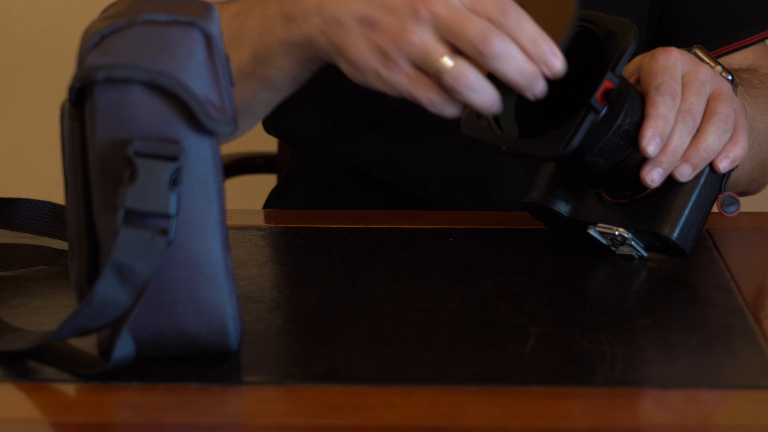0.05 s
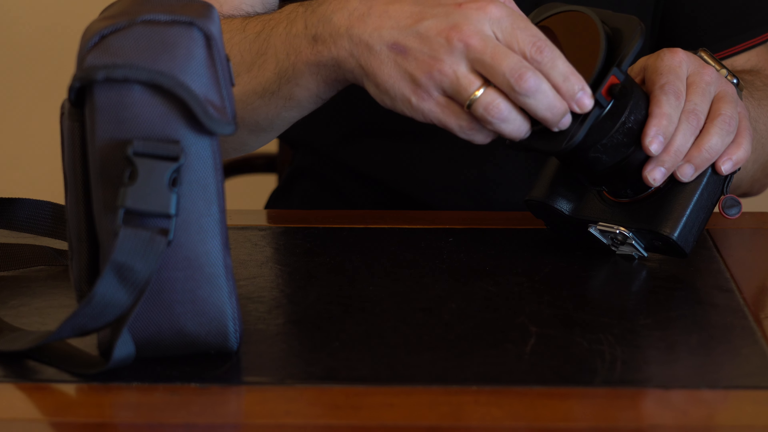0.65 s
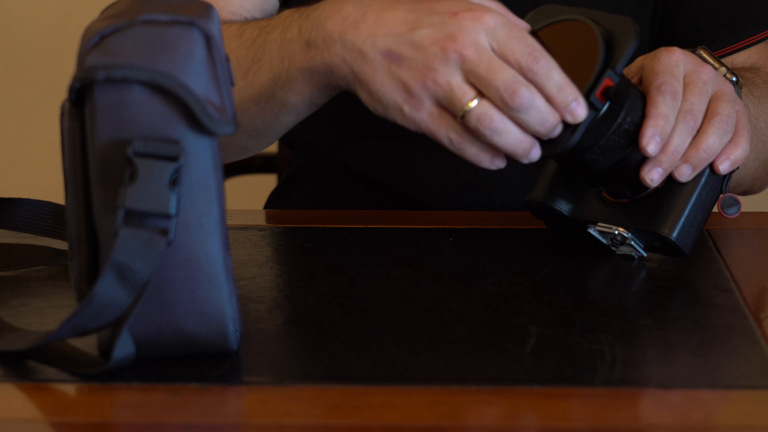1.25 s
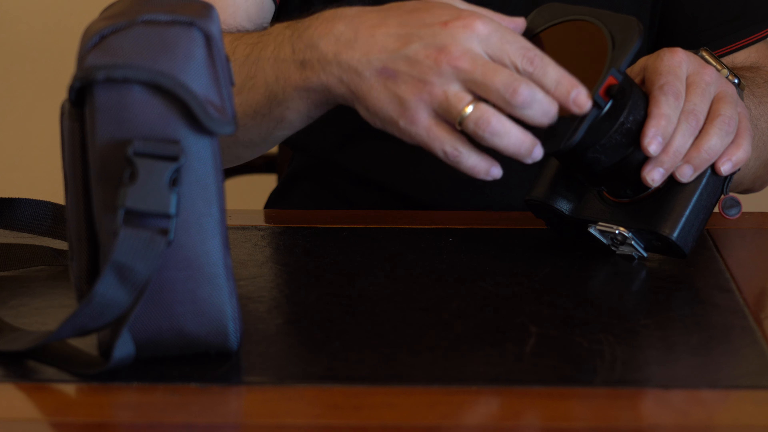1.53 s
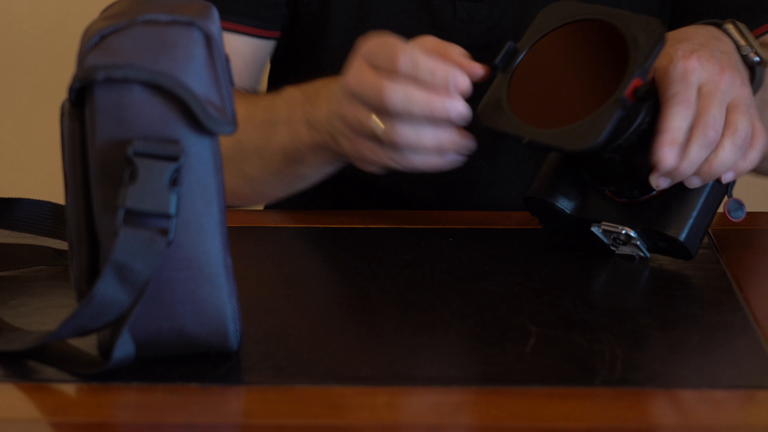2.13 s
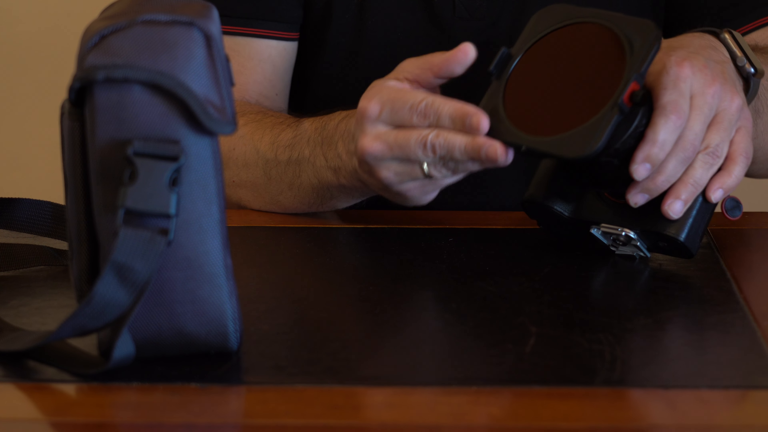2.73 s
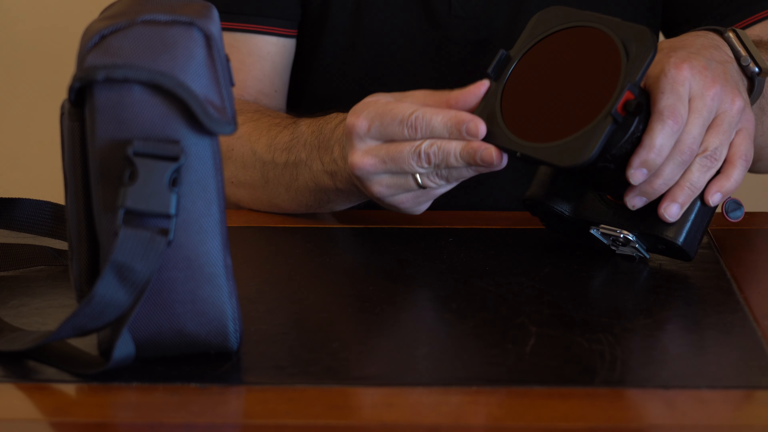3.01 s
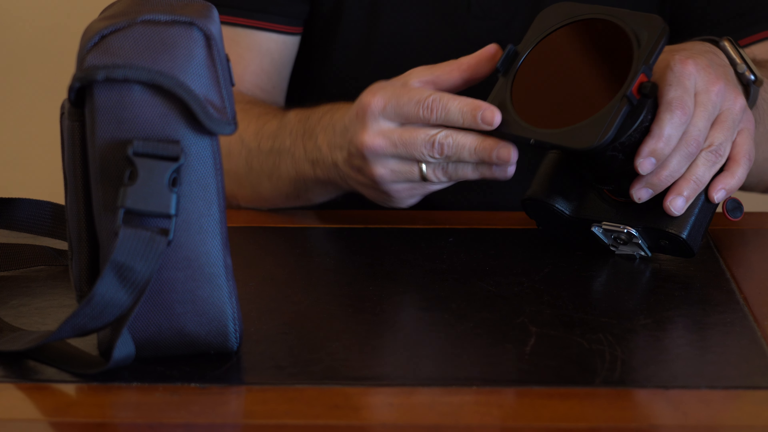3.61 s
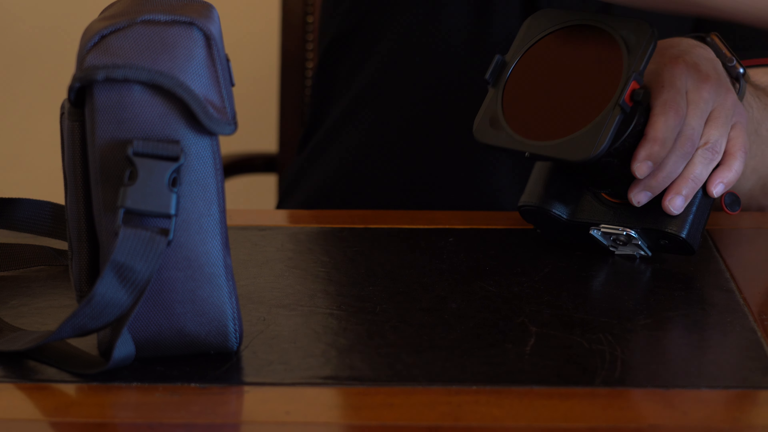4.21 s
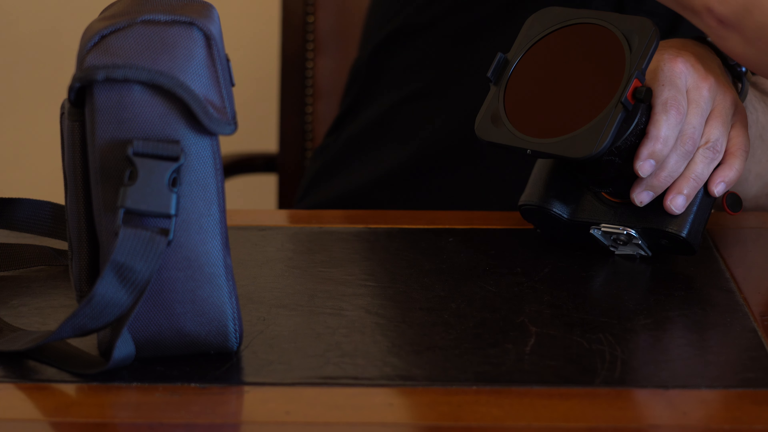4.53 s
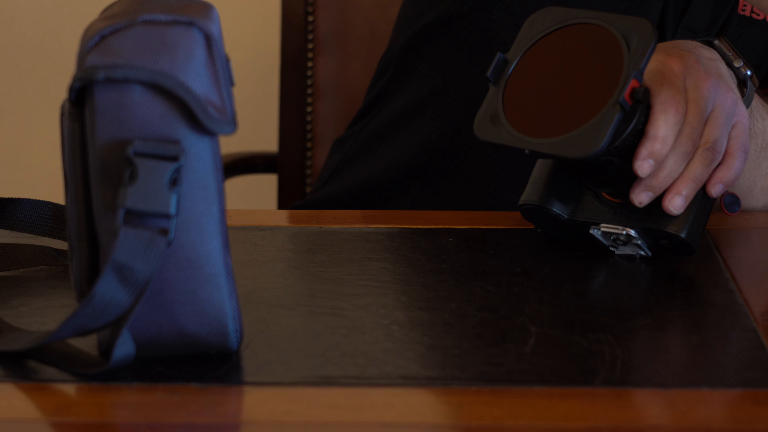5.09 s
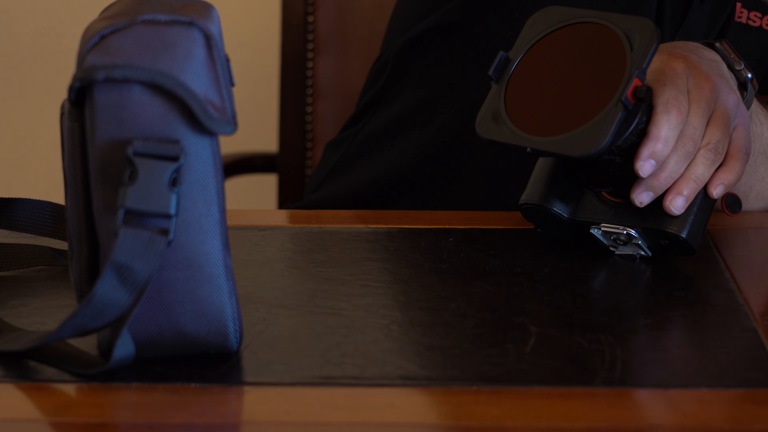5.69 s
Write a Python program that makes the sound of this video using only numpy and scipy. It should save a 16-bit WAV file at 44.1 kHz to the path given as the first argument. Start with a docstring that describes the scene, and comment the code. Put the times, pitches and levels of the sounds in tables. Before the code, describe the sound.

Sharp glassy taps, a short scrape and a loud plastic snap as a filter is fitted to a camera, then soft handling.

```python
"""At a desk in a bare room, a glass filter is tapped into a metal and plastic holder on a camera lens.
Each tap cracks and rings the glass, rim and springs; the filter rattles as it settles. A square frame
scrapes down the holder's slots in two strokes and seats with a loud snap, amid ticks, creaks and squeaks.
Afterwards an arm shifts with a rasp of its sleeve and a hand regrips the camera. Nudges make the desk
boom, and the room rings on after every contact over a low murmur of air."""
import sys
import numpy as np
from scipy import signal
from scipy.fft import rfft, irfft, next_fast_len
from scipy.io import wavfile
from scipy.ndimage import map_coordinates

SR = 44100
rng = np.random.default_rng(int(sys.argv[2]) if len(sys.argv) > 2 else 0)


def materialize(psi):
    """Save the field psi as 16-bit PCM at rate SR to the path in sys.argv[1].

    A 1-D psi becomes a single channel; in a 2-D psi each row is a channel.
    """
    bounded = np.clip(np.atleast_2d(psi).T, -1, 1)
    quanta = np.round(bounded * 32767).astype(np.int16)
    wavfile.write(sys.argv[1], SR, quanta)


N = 262395
AGE = np.arange(SR // 4) / SR  # seconds since a hit
GRID_HZ = np.fft.rfftfreq(4096, 1 / SR)

# the filter hitting the holder: start_s, crack_db, rim_db, rim_pitch_hz, springs_db, glass_db,
# favoured_glass_hz, edge_db, knock_db, barrel_db, hardness_db_per_octave
FILTER_TAPS = [(.626, -23.5, -33, 2046, -44, -34, 6880, -39, -43, -45, 3),
               (.6288, -34, -41, 1970, -38, -37, 6880, -39, -41, -71, -9.5),
               (.922, -58, -63, 2060, -55, -57, 6360, -61, -51.5, -70, 7),
               (1.041, -23, -36.5, 2108, -28, -26.5, 6520, -34, -48, -48, -0.5),
               (1.105, -29, -33, 2048, -39.5, -28, 6360, -42, -40.5, -55, 0.5),
               (1.3327, -25.5, -37.5, 2093, -41, -33.5, 6520, -38, -42, -40.5, -0.5),
               (1.341, -32, -46, 2070, -39, -33.5, 6880, -37, -47, -53, -0.5),
               (1.5305, -17, -39.5, 2104, -36, -32, 6500, -46, -33, -40.5, 11),
               (1.537, -19, -41, 2055, -37, -42, 6680, -38, -35, -36, -0.5),
               (1.546, -21.5, -44, 2085, -35, -31, 6500, -28.5, -37.5, -40, -1)]
# the frame catching and seating in the slots: start_s, crack_db, knock_db
FRAME_SNAPS = [(2.632, -60, -71), (2.92, -48, -70), (3.025, -38, -75), (3.272, -24.5, -26),
               (3.2763, -15.5, -33.5)]
# pushes along the slots, levels at full speed: start_s, length_s, scrape_db, rub_db
SLOT_PUSHES = [(1.481, 0.038, -33, -44), (2.513, 0.11, -35.5, -40), (2.887, 0.13, -25, -40)]
# the holder's clips ticking: start_s, crack_db, pitch_hz, ring_db
CLIP_TICKS = [(2.350, -47.5, 4930, -55), (2.419, -48.5, 8380, -50), (2.8737, -44, 8320, -44),
              (3.125, -33.5, 7600, -47), (3.2605, -40, 8400, -37), (3.934, -61, 5060, -67),
              (5.2837, -40.5, 9200, -60), (5.3253, -38.5, 8940, -55), (5.543, -43, 4070, -55),
              (5.8578, -50, 8600, -67)]
# plastic creaking under the fingers: start_s, pitch_hz, level_db
PLASTIC_CREAKS = [(2.635, 1630, -39), (3.023, 1920, -35.5), (3.575, 2200, -45), (3.787, 2270, -55.5),
                  (5.698, 2000, -50), (5.761, 1970, -52)]
# the camera or arm nudging the desk: start_s, boom_db, sway_db
DESK_NUDGES = [(1.556, -49, -68), (1.612, -39.5, -57), (1.72, -49, -66), (2.659, -50, -60),
               (2.745, -50, -59), (3.29, -45, -62), (3.332, -40, -43.5), (4.34, -54, -64),
               (4.461, -50.5, -62), (4.569, -52, -66), (4.635, -50, -63), (4.72, -53, -65),
               (5.208, -46.5, -60), (5.25, -50, -62)]
# shifts of the arm and hand: start_s, rise_s, hold_s, dull_rub_db, hollow_rub_db, rustle_db
ARM_MOVES = [(0, 0.0011, 0.074, -71, -74, -53.5), (4.1, .22, .17, -51, -57, -66),
             (4.555, .015, .1, -51, -53, -63), (4.71, .03, .02, -53, -63, -73),
             (5.195, 0.011, 0.062, -48.5, -67, -58), (5.262, 0.045, 0.083, -58, -50.5, -56.5),
             (5.385, 0.093, 0.059, -57, -49, -54.5), (5.602, 0.012, 0.013, -52.5, -53.5, -54)]

# stick-slip glides: time_s, pitch_hz, relative_level_db
FINGER_GLIDE = [(2.432, 4100, -64), (2.447, 4450, -51), (2.485, 4750, -48), (2.51, 4600, -54),
                (2.54, 4470, -59)]
FRAME_GLIDE = [(2.495, 725, -60), (2.51, 707, -48), (2.53, 647, -43), (2.545, 701, -38), (2.56, 690, -52),
               (2.58, 700, -62)]
SLEEVE_GLIDE = [(4.205, 5300, -68), (4.235, 5350, -52), (4.29, 5380, -51), (4.32, 5350, -43.5),
                (4.37, 5100, -44.5), (4.40, 4850, -42.5), (4.44, 4650, -46), (4.465, 4600, -54),
                (4.515, 4550, -48), (4.545, 4400, -68)]
# strands of a rubbing contact: pitch_ratio, relative_level_db
STRANDS = [(1, -2.5), (.87, -1.5), (.79, -5), (.7, -7)]

# what rings when struck: pitch_hz, relative_level_db, t60_s
GLASS_MODES = [(5470, 4, 0.031), (6220, -2, .041), (6350, -1.5, 0.074), (6460, 0.5, 0.06), (6710, -4, .045),
               (6730, -2, .046), (6800, -8, .036)]
EDGE_MODES = [(8550, -1, 0.052), (8200, -5, .05), (8700, -5, 0.032), (9100, -7, 0.031)]  # the filter's edge
SPRING_MODES = [(3534, 4, 0.029), (4014, 2.5, 0.027), (4200, -5, 0.018), (4650, -2, 0.011),
                (5360, -2, 0.013), (5700, -9, 0.033)]  # the holder's springs
BARREL_MODES = [(823, -2, 0.06), (860, -4.5, 0.071)]  # the holder's barrel
BODY_MODES = [(312, -6, 0.054), (339, -6, 0.061), (464, 1, 0.069), (624, 4, 0.037), (720, -10.5, 0.04),
              (932, 2.5, 0.023)]  # camera and holder together
FRAME_MODES = [(318, -5.5, 0.092), (505, -3, 0.077), (540, 4, 0.063), (621, 1.5, 0.059), (685, -3, 0.081),
               (962, 0.5, 0.053), (1045, -0.5, 0.05), (1220, -7, 0.073), (1260, -17, 0.069),
               (1778, 1, 0.043), (2540, -1, 0.069)]
DESK_TOP_MODES = [(98, -8, .06), (118, -4, .07), (145, 2, .055), (172, -4, .05), (198, -5, .045)]
DESK_SWAY_MODES = [(57, -9, 0.097), (76.4, -0.5, 0.086)]
ROOM_MODES = [(59.4, -48.5, 1.97), (72, -59, 1.1), (116.1, -43, 0.69), (144.1, -47, 0.71), (165, -51.5, 1),
              (312.2, -44.5, 0.56), (518, -50, 0.33), (608, -46, 0.23), (831, -53.5, 0.76),
              (928, -42.5, 0.33)]  # standing waves
# rings tuned anew for each hit: pitch_ratio, relative_level_db, t60_s
RIM_MODES = [(.96, -13, .045), (1, -3, .13), (1.025, -11, .035)]  # the filter's metal rim, whose pitch shifts with the grip
CLIP_MODES = [(.96, -1, .012), (1, 6, .015), (1.04, 1, .011), (1.13, -6, 0.025)]

# tone colours of the cracks and noises: frequency_hz, relative_level_db
TAP_EQ = [(30, -22.5), (150, -4.5), (400, -5), (1400, -5), (3000, -2.5), (5000, -1.5), (6600, 6),
          (8500, 2.5), (11000, -3), (16000, -9.5)]
SNAP_EQ = [(30, -30), (60, -12), (200, -3), (450, 7.5), (900, 3.5), (1400, 2.5), (1850, 1), (2600, 0.5),
           (4500, 1.5), (8000, 2.5), (11000, 1.5), (16000, -6)]
TICK_EQ = [(100, -4), (2000, -5), (5000, 2.5), (7200, 6), (8300, 9), (9500, 4), (16000, -1)]
SCRAPE_EQ = [(300, -77), (1200, -21), (3000, -9.5), (5000, -5), (8000, -1), (11000, -7.5), (16000, -13.5)]
RUB_EQ = [(40, -38), (120, -4.5), (250, -15), (450, -7), (680, -6), (900, -7), (1300, -7.5), (2200, -7.5),
          (4000, -13), (12000, -26)]
ARM_EQ = [(30, -54), (70, -20), (115, 4), (190, 3.5), (330, -4), (480, -4.5), (900, -16.5), (2000, -13.5),
          (5000, -30.5), (16000, -42)]
RUSTLE_EQ = [(300, -44), (900, -5), (2000, -4), (4000, -4), (8000, -11), (16000, -22)]
HOLLOW_EQ = [(100, -28), (200, -4.5), (320, 0.5), (440, -2), (600, -10), (850, -10), (1300, -23),
             (4000, -51), (16000, -70)]  # the camera body under a rubbing hand
AIR_EQ = [(15, -76), (25, -10), (43, -27), (76, -5), (149, 3), (170, -10), (206, -5), (394, -9), (503, -6),
          (545, -3.5), (695, -10), (1160, -12), (3520, -16), (16000, -25.5)]

# reverb time of the bare walls: frequency_hz, t60_s
WALL_DECAY = [(60, 0.99), (150, 1), (400, 0.5), (1000, 0.6), (2000, 0.6), (4000, 0.48), (8000, 0.44),
              (15000, 0.27)]
# stereo width of the reverb and the air: frequency_hz, side_minus_mid_db
REVERB_SPREAD = [(80, -30), (170, -23), (350, -14), (700, -9.5), (1400, -4), (2800, 0), (8000, -0.8)]
AIR_SPREAD = [(80, -32), (200, -9.5), (500, -4), (1400, 2), (8000, 0)]
# the lean to the right, added on that side and taken off the left: frequency_hz, gain_db
RIGHT_LEAN = [(300, 0), (2000, 0.33), (4000, 0), (8000, 1), (16000, 0)]


def filter_taps(favour_db=5, favour_width_hz=71, desk_under_knock_db=-12.5):
    """Each tap cracks, rings the filter and its holder, and knocks the camera and the desk under it."""
    out = np.zeros((2, N))
    for (start, crack_db, rim_db, rim_hz, springs_db, glass_db,
         favoured_hz, edge_db, knock_db, barrel_db, hardness) in FILTER_TAPS:
        rim = np.multiply(RIM_MODES, [rim_hz, 1, 1])
        # the point of contact favours the glass modes near one pitch
        glass = [(hz, db + favour_db * np.exp(-((hz - favoured_hz) / favour_width_hz) ** 2), t60)
                 for hz, db, t60 in GLASS_MODES]
        hit = amp(crack_db) * crack(TAP_EQ, t60_s=0.02, rise_s=0.0001, spike=1.8, tilt_db=hardness)
        for modes, db in [(rim, rim_db), (SPRING_MODES, springs_db), (glass, glass_db),
                          (EDGE_MODES, edge_db), (BARREL_MODES, barrel_db)]:
            hit += amp(db) * ring(modes, scatter_db=1.5, detune=0.002, rise_s=0.0003)
        hit += amp(knock_db) * ring(BODY_MODES, scatter_db=0.5, detune=0.023, rise_s=0.00026)
        desk = ring(DESK_TOP_MODES, scatter_db=2, detune=0.014, rise_s=0.0026)
        hit += amp(knock_db + desk_under_knock_db) * desk
        add(out, start, room(hit, wet_db=1.5))
    return out


def filter_rattle(start_s=1.565, gap_s=0.021, contacts=6, level_db=-25, loss_db=3):
    """The settling filter chatters in ever weaker, uneven contacts, each with a knock of the holder."""
    out = np.zeros((2, N))
    for k, jitter in enumerate(rng.uniform(-0.3, 0.3, contacts)):
        click = crack(TAP_EQ, t60_s=0.017, rise_s=0.0004, spike=0.82)
        knock = amp(-10.5) * ring(BODY_MODES, scatter_db=2.5, detune=0.039, rise_s=0.00068)
        hit = amp(level_db - k * loss_db) * (click + knock)
        add(out, start_s + (k + jitter) * gap_s, room(hit, wet_db=4))
    return out


def frame_snaps():
    """The plastic frame catches, then hits its stop: a broad crack over a hollow knock."""
    out = np.zeros((2, N))
    for start, crack_db, knock_db in FRAME_SNAPS:
        hit = amp(crack_db) * crack(SNAP_EQ, t60_s=0.014, rise_s=0.00096, spike=0.77)
        hit += amp(knock_db) * ring(FRAME_MODES, scatter_db=1.5, detune=0.003, rise_s=0.0004)
        add(out, start, room(hit, wet_db=5))
    return out


def slot_slides(grip_s=0.057, stop_t60_s=0.11):
    """Edges scrape in the slots over a lower rub; as a push gathers speed, the scrape swells most."""
    scrape_gain, rub_gain = np.zeros((2, N))
    for start, length, scrape_db, rub_db in SLOT_PUSHES:
        scrape_gain += amp(scrape_db) * stroke(start, grip_s, length, stop_t60_s, swell_db=48)
        rub_gain += amp(rub_db) * stroke(start, grip_s, length, stop_t60_s, swell_db=1)
    scrape = scrape_gain * friction(SCRAPE_EQ, slips_per_s=900, grit=0.76, judder_db=-2)
    rub = rub_gain * friction(RUB_EQ, slips_per_s=430, grit=0.47, judder_db=2)
    return room(scrape + rub, wet_db=-1)[:, :N]


def clip_ticks():
    """The holder's clips tick, light and bright, each with a brief ring."""
    out = np.zeros((2, N))
    for start, crack_db, hz, ring_db in CLIP_TICKS:
        modes = np.multiply(CLIP_MODES, [hz, 1, 1])
        hit = amp(crack_db) * crack(TICK_EQ, t60_s=0.014, rise_s=0.0002, spike=1)
        hit += amp(ring_db) * ring(modes, scatter_db=1, detune=0.002, rise_s=0.0003)
        add(out, start, room(hit, wet_db=3.5))
    return out


def plastic_creaks():
    """The plastic sticks and lets go in a short pitched rasp."""
    out = np.zeros((2, N))
    for start, hz, db in PLASTIC_CREAKS:
        resonance = [(hz / 2, -30), (hz * 0.88, -4), (hz, 0), (hz * 1.12, -4), (hz * 2, -30)]
        rasp = amp(db) * crack(resonance, t60_s=0.029, rise_s=0.00032, spike=0)
        add(out, start, room(rasp, wet_db=-1))
    return out


def squeaks():
    """A fingertip squeaks on the frame, the frame groans into motion, a sleeve drags in a falling rasp."""
    finger = stick_slip(FINGER_GLIDE, STRANDS[:2], roughness=0.06, flutter_db=2, overtone_db=-24)
    frame = stick_slip(FRAME_GLIDE, STRANDS[:1], roughness=0.2, flutter_db=3, overtone_db=-14)
    sleeve = stick_slip(SLEEVE_GLIDE, STRANDS, roughness=0.048, flutter_db=3.5, overtone_db=-11)
    return room(amp(-3) * (finger + frame + sleeve), wet_db=-1)[:, :N]


def desk_thumps(rise_s=0.0031):
    """Soft nudges make the desk top boom and the whole desk sway."""
    out = np.zeros((2, N))
    attack = 1 - np.exp(-AGE / rise_s)  # soft flesh spreads the push
    for start, boom_db, sway_db in DESK_NUDGES:
        boom = amp(boom_db) * ring(DESK_TOP_MODES, scatter_db=1, detune=0.01, rise_s=0.0026)
        sway = amp(sway_db) * ring(DESK_SWAY_MODES, scatter_db=1, detune=0.005, rise_s=0.0026)
        add(out, start, room((boom + sway) * attack, wet_db=2))
    return out


def handling(settle_t60_s=0.28):
    """The arm drags in dull stutters, the hand rubs the hollow camera body, skin and cloth rustle."""
    arm_gain, hollow_gain, rustle_gain = sum(
        np.outer(amp(levels_db), stroke(start, rise, rise + hold, settle_t60_s))
        for start, rise, hold, *levels_db in ARM_MOVES)
    arm = arm_gain * friction(ARM_EQ, slips_per_s=221, grit=1, judder_db=3.5)
    rustle = rustle_gain * friction(RUSTLE_EQ, slips_per_s=1500, grit=0.4, judder_db=4)
    hollow = hollow_gain * friction(HOLLOW_EQ, slips_per_s=110, grit=1.5, judder_db=4)
    return room(arm + rustle + hollow, wet_db=-2)[:, :N]


def room(x, wet_db, predelay_s=0.007, shadow=0.19, build_s=0.0024, bass_hz=139):
    """The direct sound, then the walls' dense reverb and the building standing waves."""
    hz, t, spectra = signal.stft(rng.standard_normal((2, SR)), SR, nperseg=256)
    decay = amp(-60 * t / along(WALL_DECAY, hz)[:, None])
    tail = signal.istft(spectra * decay, SR, nperseg=256)[1][:, :SR]
    tail = diffuse(tail, REVERB_SPREAD)
    tail = low_cut(tail / np.linalg.norm(tail[0]), bass_hz, order=2)  # standing waves take over below
    t = np.arange(SR) / SR
    build = 1 - np.exp(-t / build_s)
    for mode_hz, db, t60 in ROOM_MODES:
        tail += amp(db - 8 - 60 * t / t60) * build * np.sin(2 * np.pi * mode_hz * t)
    response = amp(wet_db) * np.pad(tail, ((0, 0), (round(predelay_s * SR), 0)))
    response[:, :3] += [[1 - shadow, shadow, 0], [0, 1 + shadow, -shadow]]  # direct: brighter on the right
    return signal.fftconvolve(x[None], response, axes=1)


def room_air(level_db=-55):
    """Room tone: a steady low murmur of air and a faint hiss."""
    murmur = filtered(rng.standard_normal((2, N)), lambda hz: amp(along(AIR_EQ, hz)))
    return amp(level_db) * unit(diffuse(murmur, AIR_SPREAD))


def crack(eq, t60_s, rise_s, spike, tilt_db=0):
    """Hard edges meet: a spike and a burst of chatter, tilted per octave so harder hits are brighter."""
    burst = rng.standard_normal(len(AGE)) * amp(-60 * AGE / t60_s) * (1 - np.exp(-AGE / rise_s))
    burst[0] += spike
    power = np.abs(rfft(burst, 2 * len(GRID_HZ) - 2)) ** 2
    flatten = 1 / np.sqrt(power / power.mean() + 0.08)  # evens out the burst's chance peaks
    octaves = np.log2(np.maximum(GRID_HZ / 700, 1))
    return unit_attack(causal(burst, flatten * amp(along(eq, GRID_HZ) + tilt_db * octaves)))


def ring(modes, scatter_db, detune, rise_s):
    """Damped modes; grip and point of contact vary their strengths and pitches at each hit."""
    hz, db, t60 = np.transpose(modes)[:, :, None]
    scatter, shift, polarity = rng.standard_normal((3, len(modes), 1))
    swing = np.sign(polarity) * np.sin(2 * np.pi * hz * (1 + detune * shift) * AGE) / hz
    decay = amp(db + scatter_db * scatter - 60 * AGE / t60)
    motion = (decay * swing).sum(0) * (1 - np.exp(-AGE / rise_s))
    return unit_attack(np.diff(motion, prepend=0))  # the surface's speed is what radiates


def friction(eq, slips_per_s, grit, judder_db, judders_per_s=130):
    """Tiny slips at random moments over a smooth hiss; the grip judders as it moves."""
    slips = (rng.random(N) < slips_per_s / SR) * rng.uniform(-1, 1, N)
    position = np.arange(N) * judders_per_s / SR
    knots = rng.uniform(-1, 1, int(position[-1]) + 2)
    judder = amp(judder_db * map_coordinates(knots, [position]))
    texture = grit * unit(slips) + rng.standard_normal(N)
    return unit(causal(judder * texture, amp(along(eq, GRID_HZ))))


def stick_slip(glide, strands, roughness, flutter_db, overtone_db, drift=0.0121, catch_db=5.5):
    """A squeal pitched by sliding speed; each strand strays with pressure and catches on its own."""
    times, hz, db = np.transpose(glide)
    t = np.arange(round(times[0] * SR), round(times[-1] * SR)) / SR
    tone = np.zeros(len(t))
    for ratio, strand_db in strands:
        stray = 1 + drift * wobble(t, 45) + roughness * wobble(t, 2500)
        pitch = ratio * np.interp(t, times, hz) * stray
        phase = 2 * np.pi * np.cumsum(pitch) / SR
        grip = amp(strand_db + catch_db * wobble(t, 55) + flutter_db * wobble(t, 500))
        tone += grip * (np.sin(phase) + amp(overtone_db + strand_db) * np.sin(2 * phase))
    out = np.zeros(N)
    add(out, times[0], unit(tone) * amp(np.interp(t, times, db)))
    return out


def stroke(start_s, rise_s, length_s, t60_s, swell_db=0):
    """Envelope of one movement: it takes hold softly, eases up to full speed, then dies away."""
    age = np.arange(N) / SR - start_s
    ease = lambda span: np.sin(np.pi / 2 * np.clip(age / span, 0, 1)) ** 2
    release_db = -60 * np.maximum(age - length_s, 0) / t60_s
    return ease(rise_s) * amp(swell_db * (ease(length_s) - 1) + release_db)


def wobble(t, knots_per_s):
    """A smooth random curve over the times t."""
    return map_coordinates(rng.standard_normal(N // 4), [t * knots_per_s])


def diffuse(pair, spread):
    """Two unrelated signals as sound from all sides: narrow in the bass, wide in the treble."""
    angle = lambda hz: np.arctan(amp(along(spread, hz)))
    mid, side = filtered(pair, lambda hz: np.array([np.cos(angle(hz)), np.sin(angle(hz))]))
    return np.array([mid + side, mid - side])


def filtered(x, response):
    """Zero-phase EQ by a gain function of frequency."""
    size = next_fast_len(x.shape[-1] + SR // 8)
    return irfft(rfft(x, size) * response(np.fft.rfftfreq(size, 1 / SR)), size)[..., :x.shape[-1]]


def low_cut(x, corner_hz, order):
    """Roll off the bass."""
    return filtered(x, lambda hz: hz ** order / np.hypot(hz ** order, corner_hz ** order))


def causal(x, gain):
    """Minimum-phase EQ with this gain on GRID_HZ: nothing rings ahead of a hit."""
    cepstrum = irfft(np.log(gain))
    half = len(cepstrum) // 2
    cepstrum[1:half] *= 2
    cepstrum[half + 1:] = 0
    return signal.fftconvolve(x, irfft(np.exp(rfft(cepstrum))))[:len(x)]


def along(points, hz):
    """Read a curve on a log frequency axis."""
    points_hz, values = np.transpose(points)
    return np.interp(np.log(hz + 1), np.log(points_hz + 1), values)


def add(track, start_s, sound):
    """Mix a sound into the track."""
    part = track[..., round(start_s * SR):][..., :sound.shape[-1]]
    part += sound[..., :part.shape[-1]]


def amp(db):
    """Decibels to gain."""
    return 10 ** (np.asarray(db) / 20)


def unit(x):
    """x at rms 1."""
    return x / np.sqrt(np.mean(x ** 2) + 1e-20)


def unit_attack(x):
    """A hit scaled to rms 1 over its first 5 ms."""
    return x / np.sqrt(np.mean(x[:SR // 200] ** 2) + 1e-20)


def scene():
    """The action at the desk over room tone; the holder sits a little right, heard in the treble."""
    action = filter_taps() + filter_rattle() + frame_snaps() + desk_thumps() + clip_ticks()
    action = action + plastic_creaks() + squeaks() + slot_slides() + handling()
    action = low_cut(action, corner_hz=44, order=4)  # the room carries little below its lowest mode
    action = filtered(action, lambda hz: amp(np.outer([-1, 1], along(RIGHT_LEAN, hz))))
    return action + room_air()


def record(dry):
    """A steep high cut on the whole mix."""
    top_hz, fade_hz = 16100, 400
    return filtered(dry, lambda hz: np.clip((top_hz - hz) / fade_hz + 0.5, 0, 1))


dry = scene()
out = record(dry)
materialize(out)
```